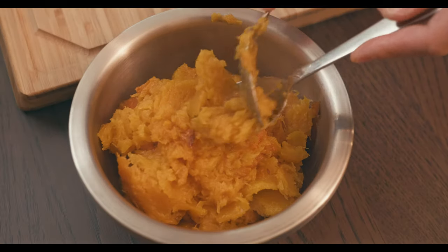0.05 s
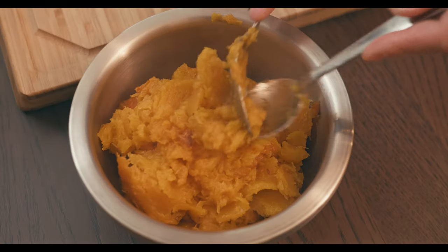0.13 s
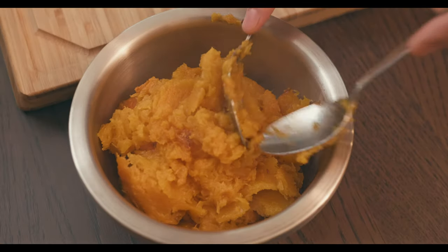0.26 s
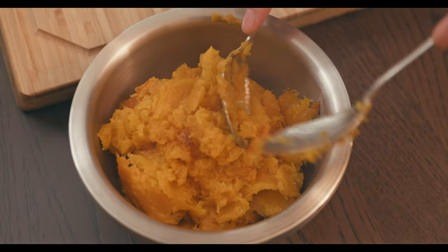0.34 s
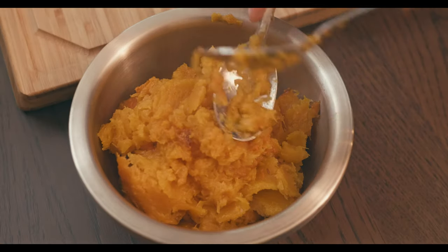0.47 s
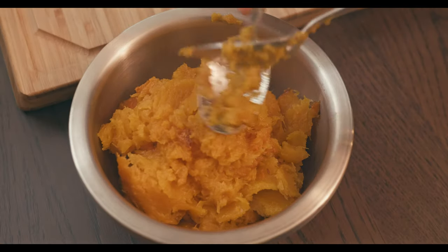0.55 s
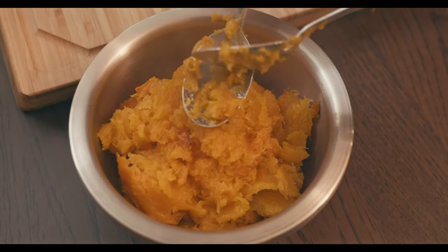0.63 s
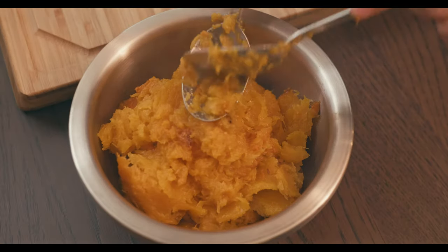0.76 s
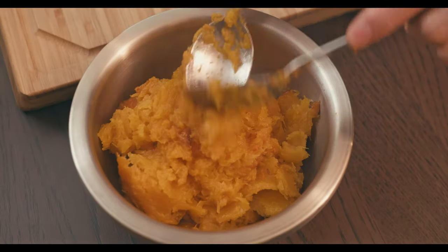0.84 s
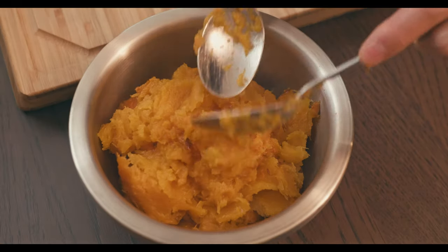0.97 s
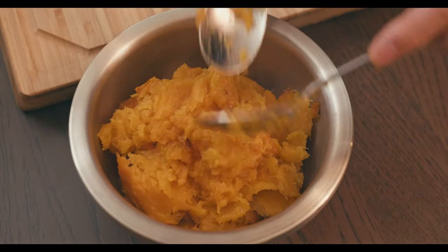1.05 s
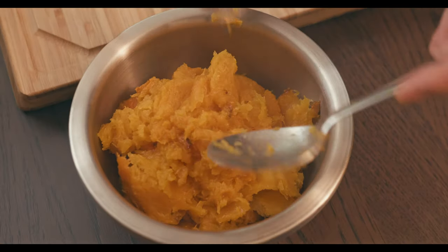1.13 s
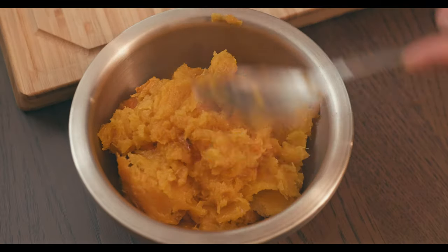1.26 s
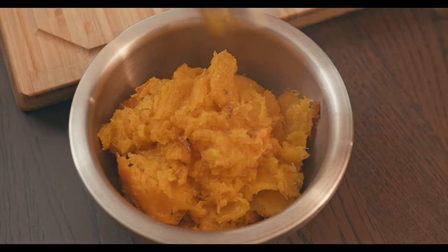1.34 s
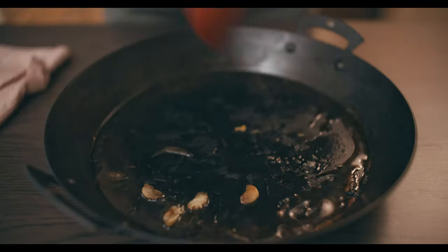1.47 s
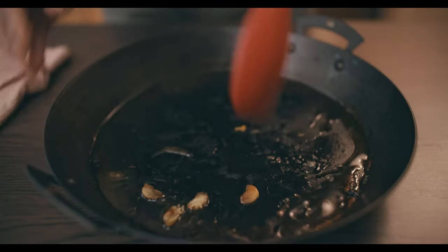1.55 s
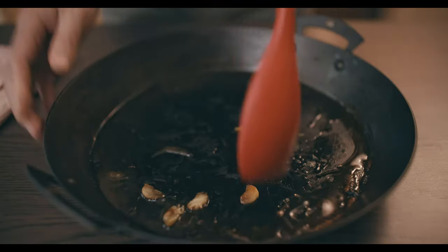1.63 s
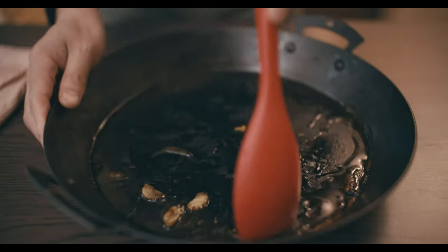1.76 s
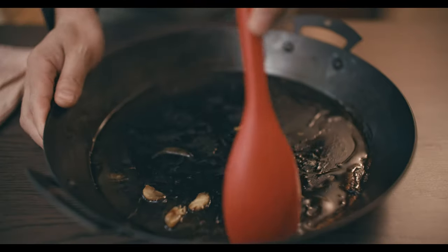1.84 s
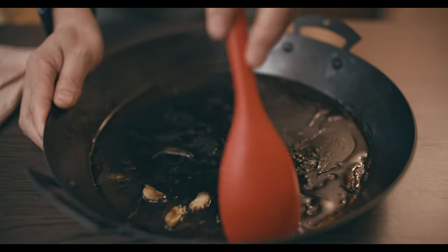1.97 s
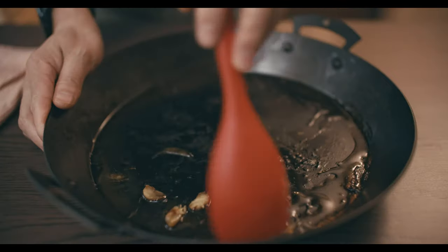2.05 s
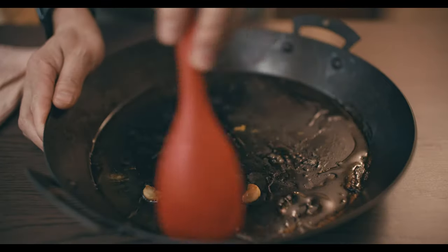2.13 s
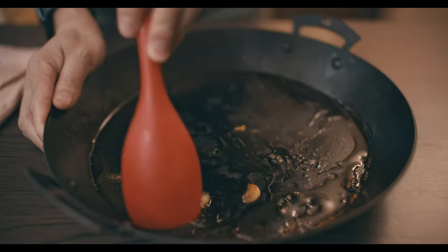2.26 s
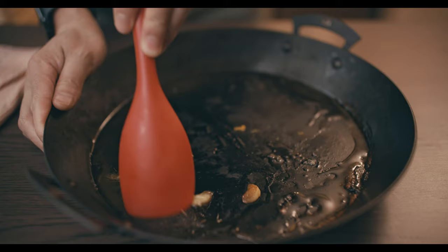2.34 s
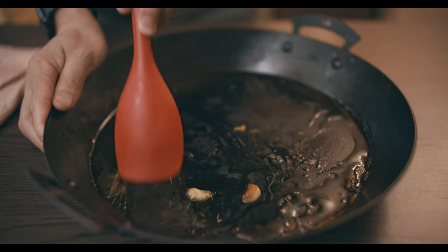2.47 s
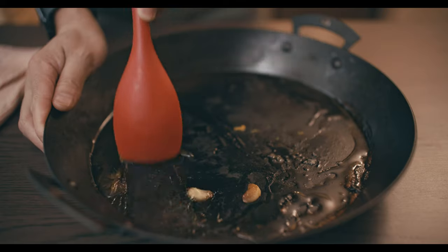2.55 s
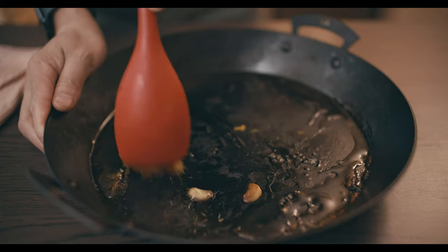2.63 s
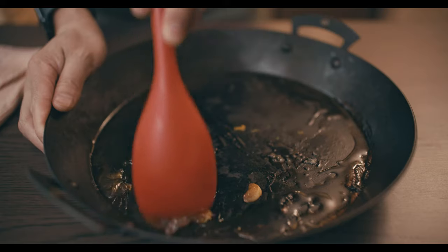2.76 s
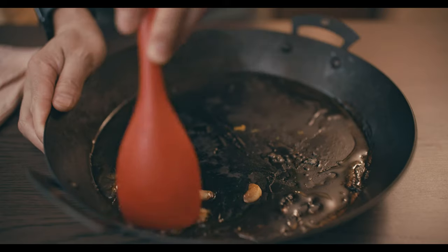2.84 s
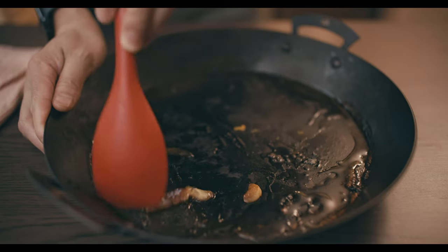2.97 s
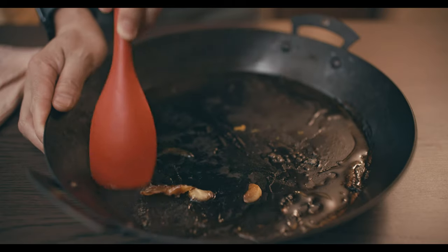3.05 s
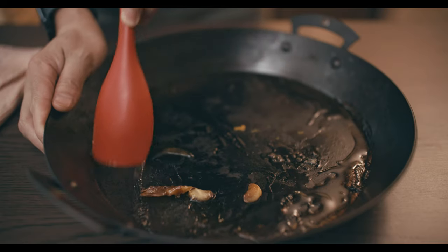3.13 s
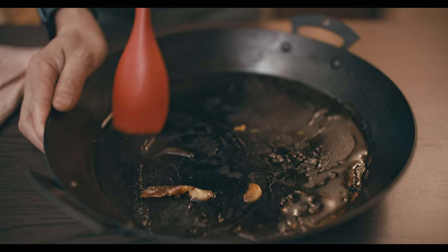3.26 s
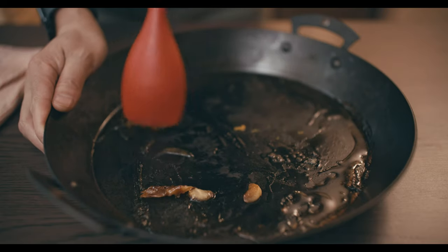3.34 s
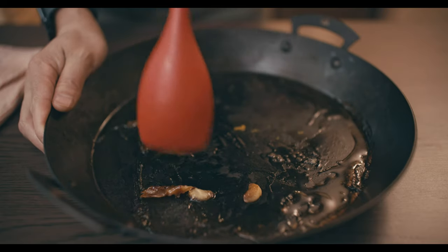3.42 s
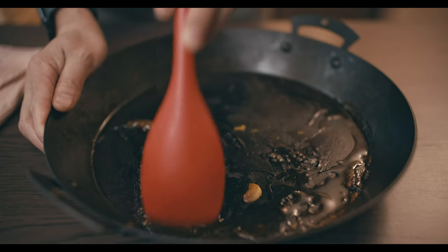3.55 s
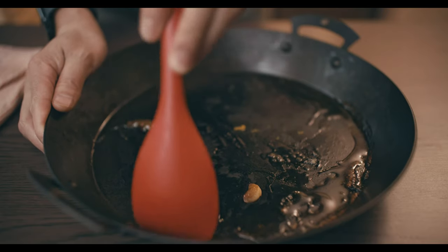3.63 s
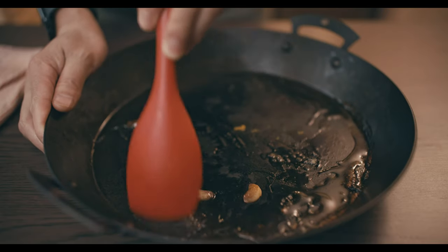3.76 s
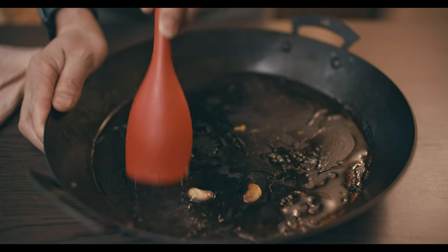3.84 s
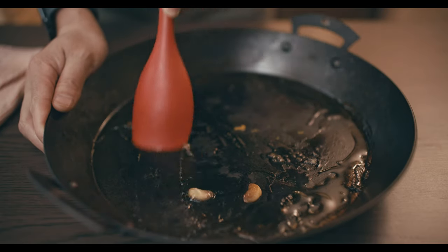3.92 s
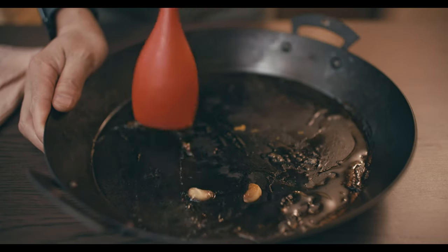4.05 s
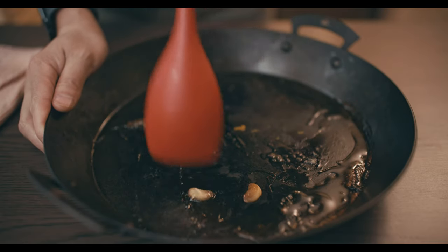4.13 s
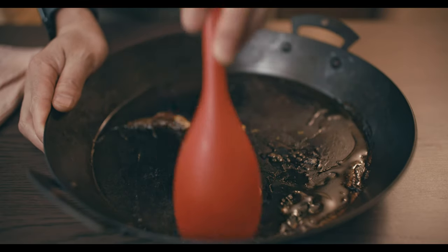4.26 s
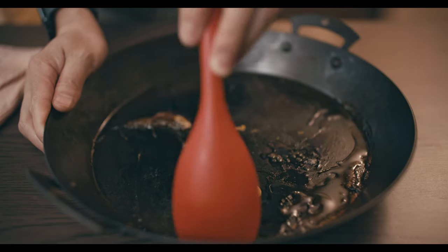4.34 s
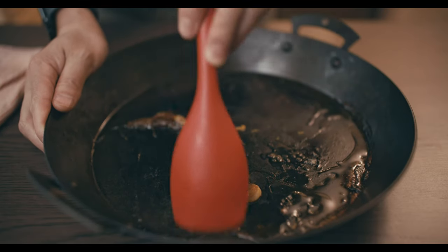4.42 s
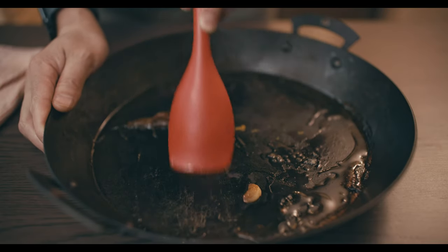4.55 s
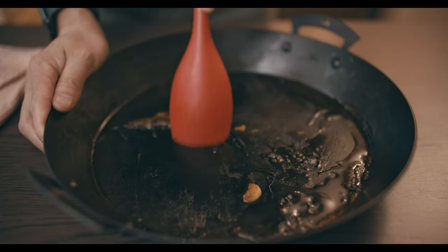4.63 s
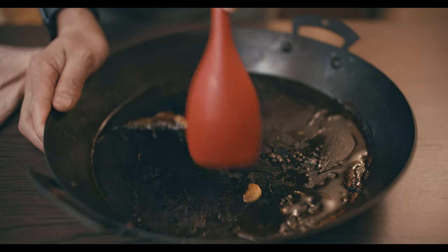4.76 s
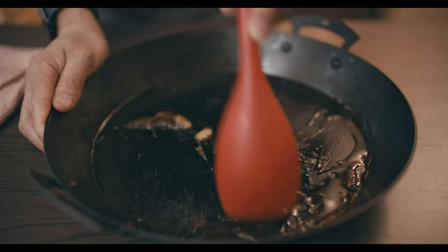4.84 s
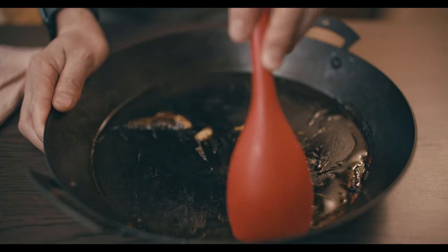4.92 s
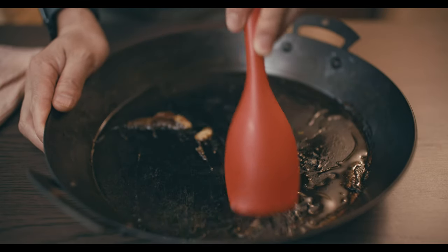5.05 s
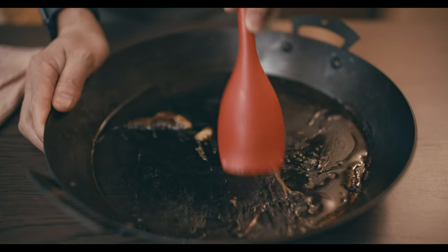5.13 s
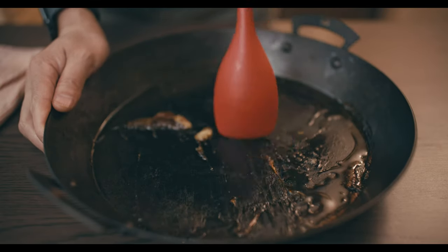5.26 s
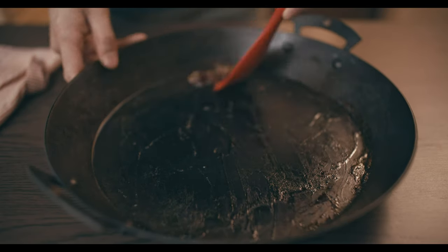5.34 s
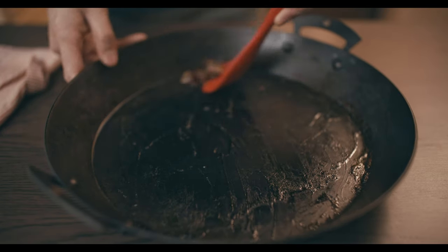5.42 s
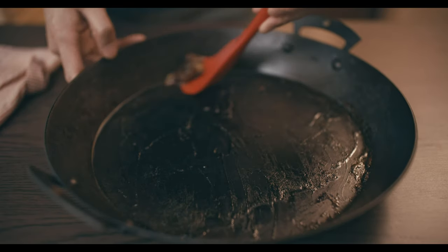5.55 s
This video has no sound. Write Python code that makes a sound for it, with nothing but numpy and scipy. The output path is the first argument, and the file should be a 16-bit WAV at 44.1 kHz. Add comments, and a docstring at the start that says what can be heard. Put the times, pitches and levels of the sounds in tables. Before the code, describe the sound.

Two steel spoons clink and scrape sticky squash off each other, then a silicone spatula knocks and scrapes around a greasy iron pan.

```python
"""Two steel spoons clink and scrape sticky squash off each other above a bowl: blows and grit ring modes.
Then a silicone spatula knocks and scrapes over the greasy floor of an iron pan on a wooden table:
pushes ring pan and table, gritty noise makes the hiss, and gliding resonances the blade's note.
Sticky food lets go in tiny wavelet ticks. Filtered noise makes the kitchen hiss and a faint appliance hum,
both louder once the gain is turned up; a short noise tail echoes the contacts."""
import sys
import numpy as np
from scipy import signal
from scipy.fft import rfft, irfft, next_fast_len
from scipy.io import wavfile
from scipy.ndimage import uniform_filter1d

SR = 44100
rng = np.random.default_rng(int(sys.argv[2]) if len(sys.argv) > 2 else 0)


def dump(signal):
    """Clip the signal to [-1, 1] and save it as 16-bit WAV at the path in sys.argv[1]."""
    limited = np.clip(np.atleast_2d(signal).T, -1, 1)
    pcm = np.round(limited * 32767).astype(np.int16)
    wavfile.write(sys.argv[1], SR, pcm)


N = 246519
T = np.arange(N) / SR
CONTROL_T = T[::32]

# Modes of the spoons. Each row: frequency in Hz, relative level when struck in dB, t60 when struck freely
# in s, relative level when dragged in dB, spoon that rings.
SPOON_MODES = [(1360, -16.5, 0.02, -7.5, "moving"), (1750, -15, 0.013, -10.5, "moving"),
               (2556, -13.5, 0.018, -14, "both"), (3040, -13.5, 0.012, -7.5, "both"),
               (3410, -9, 0.015, -4.5, "moving"), (3816, -7.5, 0.015, -6, "held"),
               (3930, -6.5, 0.012, -5, "moving"), (4300, -9.5, 0.0162, -6, "both"),
               (5000, -11.5, 0.017, -5, "held"), (5300, -18.5, 0.033, -3, "both"),
               (5964, -10.5, 0.024, -9.5, "moving"), (6170, -10.5, 0.013, -7, "held"),
               (6900, -13, 0.033, -10, "moving"), (7300, -19, 0.02, -10, "both"),
               (8290, -8.5, 0.014, -8, "both"), (9900, -18, 0.011, -10, "both"),
               (10600, -11, 0.012, -10.5, "held"), (11840, -10.5, 0.023, -14.5, "moving"),
               (12400, -14, 0.01, -10.5, "both"), (15400, -17, .012, -2.5, "moving")]
# Spoon on spoon. Each row: start in s, peak in dB, centre of the favoured modes in Hz, how much they are
# favoured in dB, moving spoon over held spoon in dB.
CLINKS = [(0.0362, -39.5, 2950, 24, -7), (0.0632, -44, 2950, 26, 0), (0.0842, -37, 2600, 12, -4),
          (0.1303, -26, 2530, 7, -6), (0.154, -32, 5900, 16, -8), (0.1655, -36, 6000, 20, -6),
          (0.17, -37, 6000, 20, -6), (0.1778, -37, 6100, 20, -6), (0.1925, -34, 6200, 13, -6),
          (0.238, -38, 4200, 12, -4), (0.2735, -36, 3730, 8, -3), (0.6772, -14, 11850, 9, 10),
          (0.69, -35, 6400, 8, 6), (0.7492, -13.5, 6135, 6, -10), (0.8303, -33, 5270, 22, 0.1),
          (0.8651, -30, 2920, 16, 6), (0.882, -35, 2950, 18, 5), (0.8972, -24, 3600, 5, -2),
          (0.911, -31, 3750, 2, 0)]
# Bare contact noise of steel. Each row: frequency in Hz, gain in dB.
STEEL = [(600, -25.5), (1400, -6.5), (4000, 5.5), (12300, 6), (13800, -5.5), (15000, -0.5), (16000, -4.5)]
# Modes of pan and table. Each row: frequency in Hz, relative level in dB, t60 when knocked in s, part.
PAN_MODES = [(60.2, 4, 0.39, "table"), (95, -1, 0.32, "board"), (131.6, 3.5, 0.23, "rim"),
             (236, 2, 0.11, "floor"), (265.5, -3.5, 0.22, "floor"), (347, -3, 0.066, "floor"),
             (479, -4, 0.12, "blade"), (504, -8.5, 0.032, "blade"), (650, -5, 0.041, "blade"),
             (833, -5, 0.049, "blade"), (987, -7, 0.14, "blade")]
PRESSED_BELOW_DB = -20  # lighter clinks leave the spoons pressed together


def undb(db):
    """Amplitude ratio of a level in dB."""
    return np.exp(np.asarray(db) * np.log(10) / 20)


def level(x, db):
    """Scale x to an rms in dB."""
    return x * undb(db) / np.sqrt(np.mean(x ** 2))


def ring(x, hz, t60_s):
    """One damped mode pushed by x; an impulse of 1 rings with amplitude 1."""
    radius = np.exp(-np.log(1000) / (max(t60_s, .002) * SR))
    w = 2 * np.pi * hz / SR
    return signal.lfilter([0, radius * np.sin(w)], [1, -2 * radius * np.cos(w), radius ** 2], x)


def glide(x, hz, width_hz):
    """A resonance whose centre moves: shift down, smooth, shift back."""
    turn = np.exp(2j * np.pi * np.cumsum(hz) / SR)
    smooth = signal.lfilter([1], [1, -np.exp(-np.pi * width_hz / SR)], x / turn)
    return np.real(smooth * turn)


def colour(x, points):
    """Shape x by a spectrum of (Hz, dB) points, straight over log frequency."""
    hz, db = np.transpose(points)
    n = next_fast_len(len(x))
    f = np.maximum(np.arange(n // 2 + 1) * SR / n, 1)
    gain = undb(np.interp(np.log(f), np.log(hz), db))
    return irfft(rfft(x, n) * gain, n)[:len(x)]


def walk(rate_hz):
    """Random levels joined by straight slews of 1 / rate_hz; rms near 1.9."""
    k = int(SR / rate_hz)
    held = np.repeat(rng.standard_normal(N // k + 1), k)
    return 2.33 * uniform_filter1d(held, k)[:N]


def grit(clicks_per_s, spread_db):
    """Noise with scattered stronger samples, sizes exponential in dB; rms 1."""
    clicks = undb(spread_db * rng.exponential(size=N)) * (rng.random(N) < clicks_per_s / SR)
    return level(rng.standard_normal(N) * (1 + clicks), 0)


def add(out, start_s, x):
    """Mix x into out at start_s."""
    i = int(start_s * SR)
    out[i:i + len(x)] += x[:N - i]


def favour(hz, centre_hz, octaves):
    """0-1 bell around the modes that the contact point excites best."""
    return np.exp(-.5 * (np.log2(hz / centre_hz) / octaves) ** 2)


def gestures(rows, touch_s, swell_db_s, lift_s, lift_db, tail_db_s):
    """dB of each contact: touch, swell to the turn, move to the last level, lift, die away."""
    curves = []
    for start, turn, end, turn_db, last_db, *_ in rows:
        times = [start - touch_s, start, turn, end, end + lift_s, end + lift_s + 1]
        start_db, lifted_db = turn_db - swell_db_s * (turn - start), last_db - lift_db
        levels = [turn_db - 39, start_db, turn_db, last_db, lifted_db, lifted_db - tail_db_s]
        # a time earlier than the one before it waits for it
        curves.append(np.interp(CONTROL_T, np.maximum.accumulate(times), levels, left=-200))
    return np.array(curves)


def together(db):
    """Gain over time of contacts that overlap: their powers add."""
    return np.interp(T, CONTROL_T, np.sqrt(np.sum(undb(db) ** 2, axis=0)))


def kitchen():
    """Room hiss and a wavering hum of narrow noise bands, both louder once the gain goes up."""
    # Hiss before and after the gain rise. Each row: frequency in Hz, relative level in dB per Hz.
    quiet_spectrum = [(15, -35.5), (25, -25), (238, -8), (288, -9.5), (358, -9.5), (617, -17), (669, -18),
                      (746, -19.5), (16500, -41.5)]
    loud_spectrum = [(15, 5), (25, -1.5), (220, 3.5), (600, -5.5), (669, -5), (746, -7.5), (3700, -25.5),
                     (15200, -28.5), (16500, -28)]
    # Appliance. Each row: frequency in Hz, level before the gain rise in dB.
    hum_bands = [(661, -87), (686, -81.5), (871, -85), (7600, -94), (8300, -93)]
    gain_up_s, ramp_s, hum_rise_db = 1.4615, 0.0017, 10.5
    up = np.clip((T - gain_up_s) / ramp_s, 0, 1)
    hum = sum(level(ring(rng.standard_normal(N), hz, 190 / hz), db) for hz, db in hum_bands)
    quiet = level(colour(rng.standard_normal(N), quiet_spectrum), -70)
    loud = level(colour(rng.standard_normal(N), loud_spectrum), -58)
    return (1 - up) * quiet + up * loud + hum * undb(hum_rise_db * up)


def ticks():
    """A film of food snaps: a short wavelet over a bare click, mirrored by the metal close by."""
    # Each row: time in s, level in dB, wavelet frequency in Hz.
    snaps = [(0.317, -46.5, 10500), (0.37, -50.5, 9500), (0.411, -52.5, 6000), (0.4477, -51, 3100),
             (0.4564, -50, 10300), (0.4812, -51, 5500), (0.9737, -39, 9500), (1.761, -49, 4470),
             (1.856, -40.5, 5260), (1.8706, -40, 2400), (2.1042, -42, 5920), (2.8826, -49, 11000),
             (3.184, -36, 7700), (3.3338, -44, 9000), (3.6576, -46, 1990), (4.0725, -47, 12000),
             (4.5295, -45, 9000), (5.119, -41, 9497), (5.3433, -36, 8300), (5.355, -45, 13000),
             (5.4584, -34, 14500), (5.4631, -40, 5370), (5.5051, -33, 11500), (5.5097, -39, 12000),
             (5.5134, -31, 7000), (5.5166, -27, 7000), (5.5237, -32, 9000), (5.5357, -30, 9800),
             (5.5374, -35, 9500), (5.5494, -36, 10500)]
    out = np.zeros(N)
    lead_s = T[60]
    t = T[:200] - lead_s
    for s, db, hz in snaps:
        cycles = t * hz
        envelope = np.exp(-(cycles / np.where(t < 0, .5, 1.3)) ** 2)  # faster rise than fall
        snap = envelope * np.sin(2 * np.pi * cycles + 0.43)
        snap[59:62] += 0.6 * np.array([-.5, 1, -.5])  # click
        snap += undb(-4) * np.roll(snap, 16)  # reflection, 16 samples late
        add(out, s - lead_s, undb(db) * snap)
    return out


def rumble(gain):
    """Strokes keep the modes of pan and table humming: noise through short resonances."""
    # Relative shaking of each part in dB, keyed by part.
    part_db = dict(table=-19, board=2, rim=-6.5, floor=-3, blade=-12)
    shake = 0
    for hz, mode_db, t60_s, part in PAN_MODES:
        mode = level(ring(rng.standard_normal(N), hz, 0.19 * t60_s), 0)
        shake = shake + undb(mode_db + part_db[part]) * mode
    return level(shake, 0) * gain


def thuds():
    """A soft push rings table, board and pan, and the blade slaps; each knock shares its force differently."""
    # Spatula or pan knocking down. Each row: start in s, low thump in dB, thump note in Hz,
    # pan floor in dB, blade in dB.
    knocks = [(1.578, -43, 99, -41.5, -45), (1.619, -50, 101, -47, -51.5), (1.76, -56, 90, -48, -48),
              (1.828, -30.5, 91, -63, -52), (1.84, -35, 97, -26.5, -36), (1.888, -39, 107, -38, -49.5),
              (1.963, -34.5, 74.7, -42, -69), (2.11, -40.5, 123, -51, -66), (2.128, -38.5, 95, -45, -53),
              (2.159, -41.5, 62, -55, -70), (3.082, -54, 112, -46, -58), (3.655, -26, 117.7, -34.5, -43),
              (3.69, -39.5, 62, -47, -47), (4.374, -36, 70.5, -51.5, -51), (4.448, -42.5, 123, -70, -72),
              (4.558, -43.5, 116, -76, -49), (4.97, -36.5, 114.7, -44, -49.5), (4.997, -38.5, 63, -49, -69),
              (5.463, -40.5, 82, -45, -42)]
    thump_db, thump_octaves = 20, 0.35  # how far low modes away from the note drop, width of the bell
    slap_t60_s = 0.13
    slap_spectrum = [(150, -15), (350, 2), (900, -8.5), (2500, -31), (16000, -58)]  # (Hz, dB)
    out, t = np.zeros(N), T[:SR // 2]
    rings = []
    for k, (hz, mode_db, t60_s, _) in enumerate(PAN_MODES):
        push_s = 0.00088 + 0.16 / hz  # the heavier the part, the longer the push that reaches it
        push = np.sin(np.pi * np.clip(t / push_s, 0, 1))
        rings.append((-1) ** k * undb(mode_db) * ring(push / push.sum(), hz, t60_s))
    for s, low_db, thump_hz, floor_db, blade_db in knocks:
        slap = rng.standard_normal(len(t)) * undb(-60 * t / slap_t60_s)
        y = undb(blade_db + 13.5) * colour(slap, slap_spectrum)
        for mode, (hz, _, _, part) in zip(rings, PAN_MODES):
            thump = low_db - thump_db * (1 - favour(hz, thump_hz, thump_octaves))
            y += mode * undb(dict(floor=floor_db, blade=blade_db).get(part, thump))
        add(out, s, y)
    # the last knock catches the pan wall, which rings on
    add(out, 5.463, undb(-58) * ring(1. * (t == 0), hz=1450, t60_s=1.2))
    return out


def stroke_controls():
    """Gains of hiss, treble and shaking over time, and the note of the blade in Hz."""
    # Spatula strokes and brushes. Each row: starts in s, turns in s, ends in s (a time earlier than the one
    # before it waits for it), level at the turn in dB, last level in dB, treble over hiss at the turn in dB,
    # shake at the turn in dB, blade note in Hz.
    strokes = [(1.462, 1.492, 2.08, -63, -76, -12, -71, 1740),
               (1.761, 1.793, 1.79, -55, -61, -16, -60, 1760), (1.8, 1.81, 1.89, -61, -65, 2, -58, 2400),
               (1.91, 1.99, 2.08, -68, -72, 3, -55, 2200), (2.104, 2.122, 2.17, -55.5, -66, -3, -48, 2360),
               (2.175, 2.24, 2.3, -50, -53, -6, -51.5, 2300),
               (2.308, 2.45, 2.58, -46.5, -55, -0.5, -54, 1750),
               (2.575, 2.62, 2.632, -52, -53, -4, -51, 2000),
               (2.803, 2.818, 2.87, -74.5, -82, 13.5, -74, 1979),
               (2.885, 3.02, 3.075, -57.5, -62, -3, -56, 1960),
               (3.07, 3.09, 3.355, -60, -59.5, -9, -56, 2030), (3.086, 3.09, 3.096, -59, -59, 2, -60, 2030),
               (3.478, 3.507, 3.68, -65, -83, -18, -76, 1960),
               (3.673, 3.676, 3.72, -45.5, -86, -8.5, -42, 2100),
               (3.736, 3.979, 4.015, -50, -56, 0, -49, 1590),
               (4.031, 4.063, 4.02, -52.5, -51, -5.5, -54.5, 1690),
               (4.355, 4.373, 4.35, -61, -63, 0, -52.5, 2200),
               (4.435, 4.49, 4.515, -56.5, -49.5, -10.5, -60, 1870),
               (4.53, 4.55, 4.562, -57, -53, -8, -50, 1700),
               (4.562, 4.575, 4.665, -44.5, -47, -3, -53, 1700),
               (4.665, 4.68, 4.745, -52, -64, -3, -55, 1900),
               (4.971, 4.969, 4.988, -58.5, -64, -29, -45, 1848),
               (5.058, 5.125, 5.2, -60, -77, -10, -54.5, 1898),
               (5.152, 5.162, 5.19, -51.5, -49, -7, -71, 1960), (5.2, 5.25, 5.335, -47, -60, -2, -54, 1500),
               (5.304, 5.336, 5.46, -62, -62, -6, -60.5, 2771),
               (5.46, 5.525, 5.57, -62, -64.5, 8, -56, 1450)]
    duller_db, shake_share = 0.83, 0.62  # treble over hiss and shake lost per dB below the turn's level
    unbend_octaves = 0.026  # before the turn: blade note raised per dB below the turn's level
    db = gestures(strokes, touch_s=0.01, swell_db_s=52, lift_s=0.012, lift_db=12, tail_db_s=121)
    _, turn_s, _, turn_db, _, treble_db, shake_db, note_hz = np.array(strokes).T[..., None]
    below_db = turn_db - db
    capped_db = np.minimum(below_db, 12)
    bent_hz = note_hz * 2 ** (unbend_octaves * capped_db * (CONTROL_T < turn_s))
    power = undb(db) ** 2
    blade_hz = np.sum(power * bent_hz, axis=0) / np.sum(power, axis=0)
    treble = together(db + treble_db - duller_db * capped_db)
    shake = together(np.where(db > -150, shake_db - shake_share * below_db, db))
    return together(db), treble, shake, np.interp(T, CONTROL_T, blade_hz)


def spatula(hiss, treble, blade_hz):
    """Soft edge over greasy iron: gritty hiss in narrow streaks that come and go, and a rubbing blade."""
    # Each row: frequency in Hz, gain in dB.
    hiss_spectrum = [(300, -3), (600, -17), (1150, -7.5), (1500, -4), (1900, -1.5), (3300, -7.5),
                     (5000, -10), (10000, -9.5), (15000, -20.5), (16500, -50)]
    slip = colour(grit(3000, 1.5), hiss_spectrum) * undb(.7 * walk(90))
    low, high = 0, 0
    # the dense pan resonances swell and fade as the edge moves
    for hz in np.arange(550, 16200, 200):
        band = signal.butter(1, [hz - 70, hz + 70], "band", fs=SR, output="sos")
        streak = signal.sosfilt(band, slip) * undb(1.6 * walk(28))
        high_share = np.clip(np.log2(hz / 3200) / 1.28, 0, 1)
        low = low + np.sqrt(1 - high_share) * streak
        high = high + np.sqrt(high_share) * streak
    bare = grit(3000, 1.5)
    rub = 0
    # two bending modes of the blade, each catching and slipping on its own
    for ratio, mode_db in ((1, 1.5), (1.75, -6)):
        catch = bare * undb(2.2 * walk(35))
        rub = rub + undb(mode_db) * glide(catch, blade_hz * ratio, width_hz=140)
    return hiss * (level(rub, -7.5) + level(low, -1.3)) + treble * level(high, 0.1)


def drag_gain():
    """Gain of the spoon drags, and of loose edges chattering after each free clink."""
    # An edge dragged over the other spoon. Each row: starts in s, turns in s, ends in s,
    # level at the turn in dB, last level in dB.
    drags = [(.008, .02, .04, -67, -64), (.045, .07, .14, -59, -56), (.15, .165, .225, -55, -54),
             (.225, .255, .273, -50, -51), (.69, .7, .745, -53, -56), (.76, .765, .82, -49, -52),
             (.805, .864, .912, -45.5, -46), (.93, .94, 1.03, -61, -74)]
    rattle_db, rattle_decay_db_s = -21.5, 799.5  # chatter relative to the clink's peak
    drag_db = gestures(drags, touch_s=.01, swell_db_s=150, lift_s=.01, lift_db=13, tail_db_s=150)
    start_s, clink_db, *_ = np.transpose(CLINKS)[..., None]
    since_s = CONTROL_T - start_s
    chatter_db = clink_db + rattle_db - rattle_decay_db_s * since_s
    chatter_db = np.where((since_s > 0) & (clink_db > PRESSED_BELOW_DB), chatter_db, -200)
    return together([*drag_db, *chatter_db])


def steady(x):
    """Even out the level over 900 samples, to rms near 1."""
    return x / np.sqrt(uniform_filter1d(x ** 2, size=900))


def spoon_drag():
    """Stick-slip grit runs into the spoon modes; the moving contact picks which ones sound."""
    # Squeak of the hollow between the spoon bowls as the contact slides. Each row: time in s,
    # frequency in Hz, level over the drag in dB.
    squeaks = [(.03, 2940, -10), (.085, 2830, -5), (.11, 3700, -5), (.14, 3980, -13), (.152, 5800, -3),
               (.19, 5900, -4), (.27, 6330, -3.5), (.69, 6100, -6.5), (.8, 6300, -8.5), (.82, 5300, -3),
               (.862, 5300, 1), (0.865, 2900, 2), (.89, 2850, -7.5), (.9, 4900, -9)]
    slip = colour(grit(900, 2.6) * undb(1.7 * walk(300)), STEEL)
    y = undb(20.5) * slip
    for hz, _, t60_s, mode_db, _ in SPOON_MODES:
        push = slip * undb(mode_db + 2.8 * walk(30) + 2.5 * walk(150))
        y += ring(push, hz, .55 * t60_s)
    s, hz, db = np.transpose(squeaks)
    squeak_hz = np.interp(T, s, hz) * (1 + 0.0095 * walk(66))
    squeak = glide(slip * undb(2.5 * walk(200)), squeak_hz, width_hz=150)
    # the hand sets the level, whichever modes sound
    return (steady(y) + steady(squeak) * undb(np.interp(T, s, db))) * drag_gain()


def clinks():
    """Each blow is a sharp contact with a brief rattle; it rings the modes of both spoons and cracks."""
    pressed_ring, pressed_shift = .6, .015  # t60 factor, spread of the mode frequencies as a share
    out, t = np.zeros(N), T[:SR // 8]
    highpass = signal.butter(2, 600, "high", fs=SR, output="sos")
    for s, db, centre_hz, favour_db, moving_db in CLINKS:
        pressed = db < PRESSED_BELOW_DB
        noise = rng.standard_normal(len(t))
        shifts = rng.standard_normal(len(SPOON_MODES))
        push = .3 * noise * np.exp(-t / .0008)
        push[0] = 3.6
        push = signal.sosfilt(highpass, push)
        spoon_db = dict(moving=moving_db / 2, held=-moving_db / 2, both=0)
        y = undb(-3.5 - 6 * pressed) * colour(noise * np.exp(-t / .0022), STEEL)  # crack
        for k, (hz, mode_db, t60_s, _, spoon) in enumerate(SPOON_MODES):
            gain_db = mode_db + spoon_db[spoon] + favour_db * favour(hz, centre_hz, 0.099)
            mode_hz = hz * (1 + pressed_shift * pressed * shifts[k])
            y += (-1) ** k * undb(gain_db) * ring(push, mode_hz, t60_s * pressed_ring ** pressed)
        add(out, s, y * undb(db) / np.abs(y).max())
    return out


def scene():
    """All contacts, their echo from the room's walls as a decaying noise tail, and the kitchen."""
    room_t60_s, room_db = 0.3, -22
    hiss, treble, shake, blade_hz = stroke_controls()
    pan = rumble(shake) + thuds() + spatula(hiss, treble, blade_hz)
    near = ticks() + pan + spoon_drag() + clinks()
    t = T[:SR // 2]
    walls = rng.standard_normal(len(t)) * undb(-60 * t / room_t60_s) * (t > .004)
    walls = colour(walls, [(100, -32), (500, -0.5), (3000, -18.5), (16000, -17)])
    echo = signal.fftconvolve(near, walls / np.sqrt(np.sum(walls ** 2)))[:N]
    return (near + undb(room_db) * echo + kitchen())[None]


def record(dry):
    """The recorder cuts the top: a steep low-pass at 15.9 kHz."""
    return signal.sosfilt(signal.ellip(10, .2, 70, 15900, fs=SR, output="sos"), dry)


dry = scene()
out = record(dry)
dump(out)
```